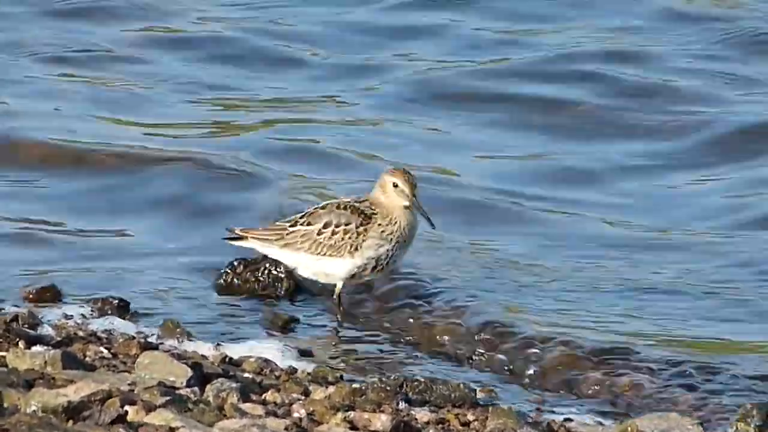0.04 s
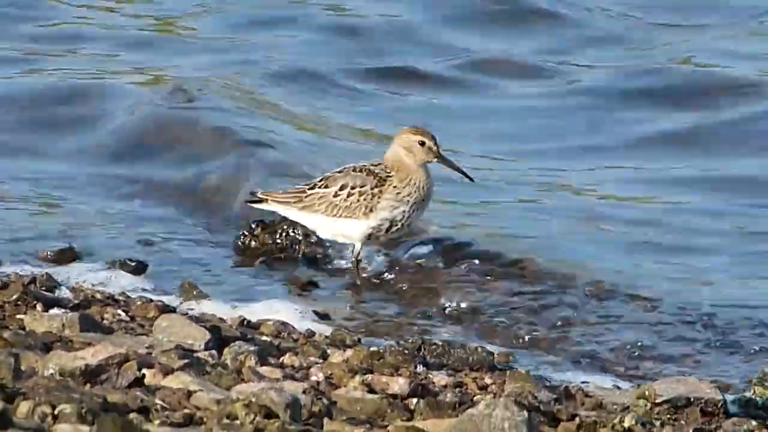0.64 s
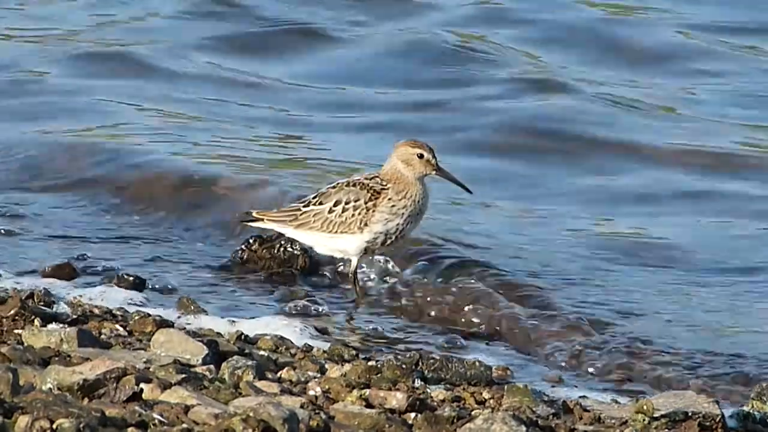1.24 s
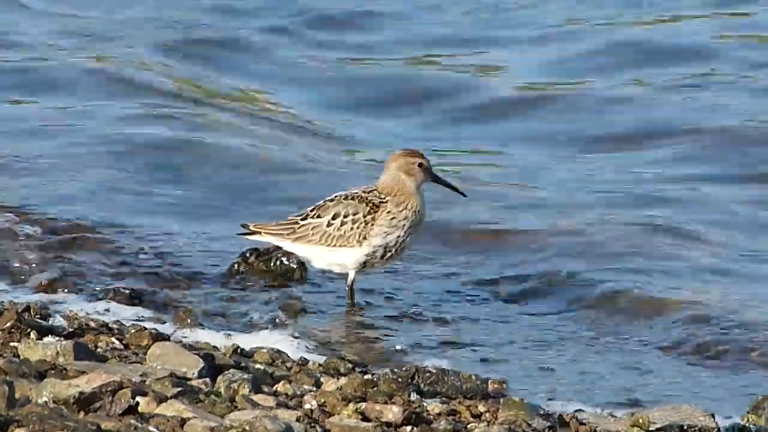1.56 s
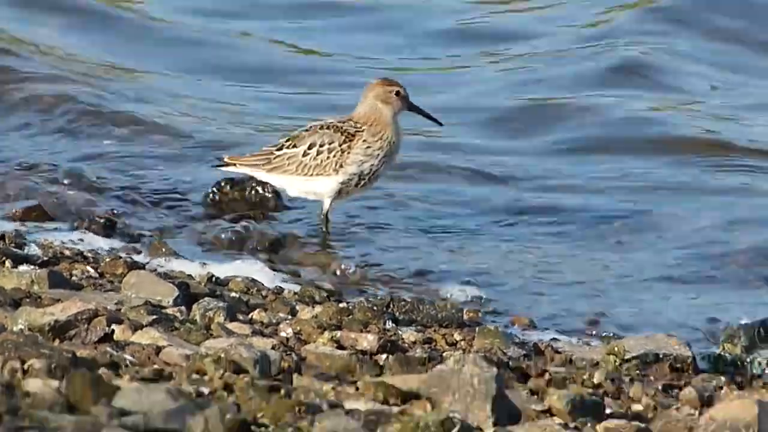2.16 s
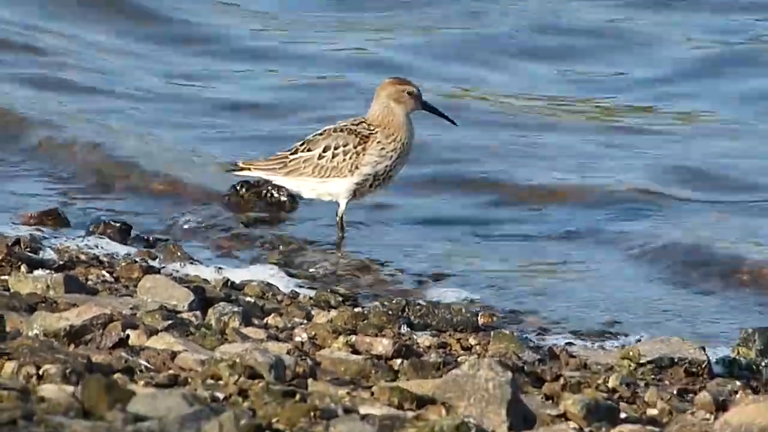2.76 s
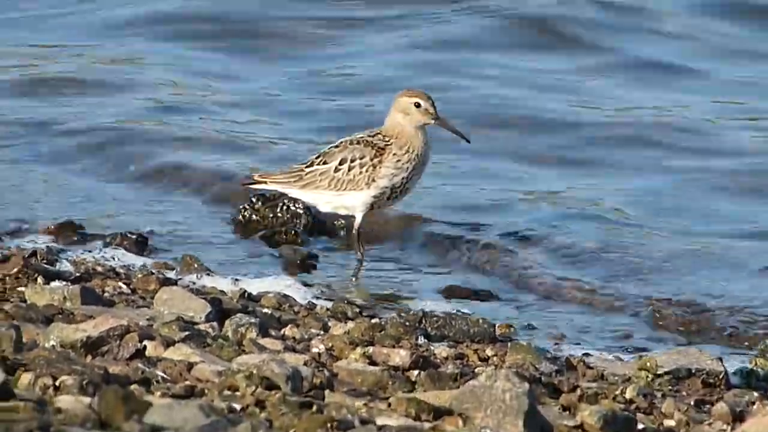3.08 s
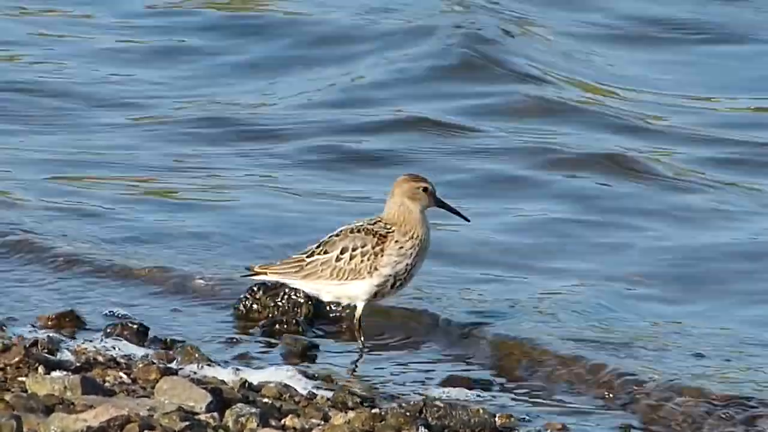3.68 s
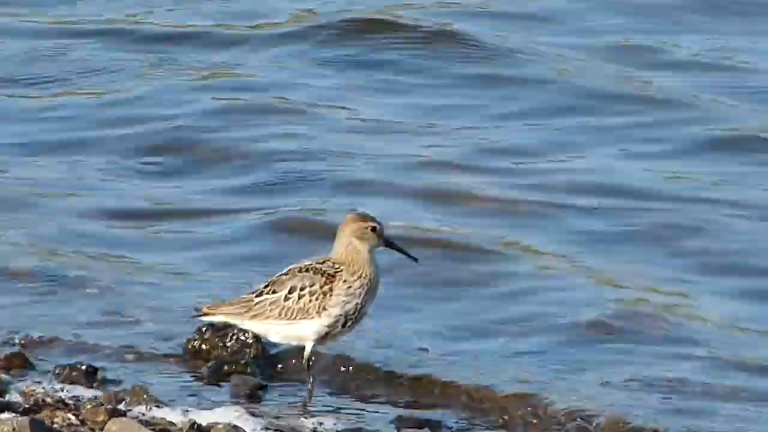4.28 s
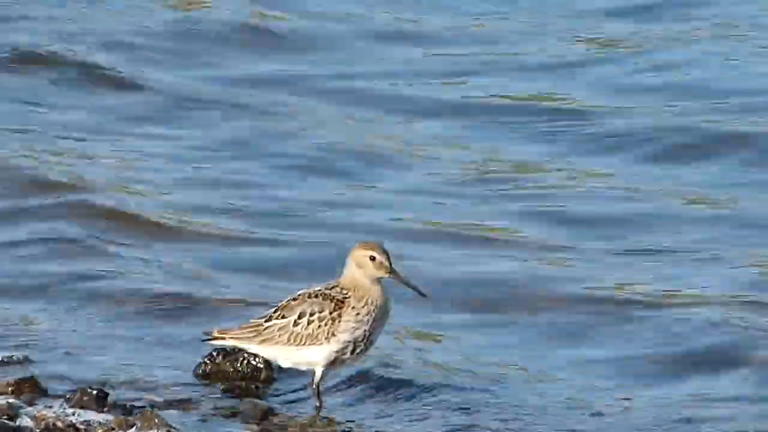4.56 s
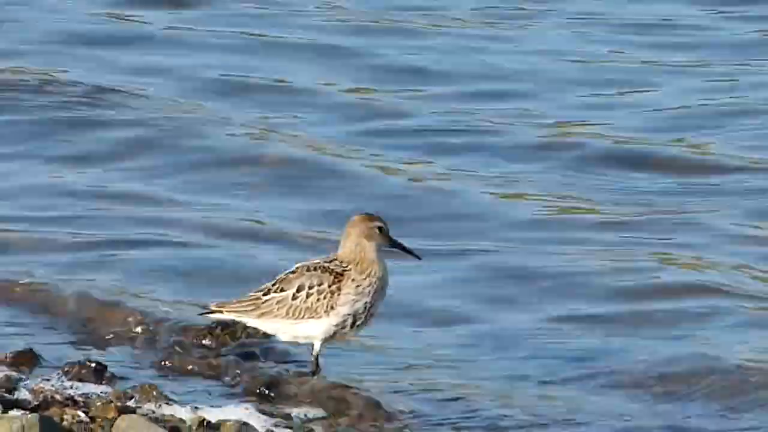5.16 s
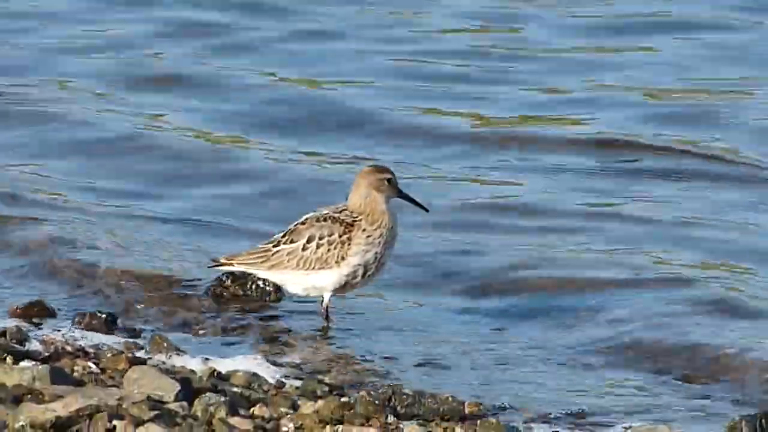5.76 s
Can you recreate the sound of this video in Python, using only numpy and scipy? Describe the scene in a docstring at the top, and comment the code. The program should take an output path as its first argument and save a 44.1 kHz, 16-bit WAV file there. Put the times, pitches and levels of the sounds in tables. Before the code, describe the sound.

Gusty wind buffets the microphone from the start, a low, wide rumble with irregular flutters and soft thumps. Beneath it, small waves wash over a pebble shore in a faint, continuous hiss and gurgle. At about 0.6, 0.8 and 1.0 seconds, a camera close by on the left fires three shots, each a short, harsh, metallic rasp of shutter and motor. Foam fizzes briefly at 1.6 seconds. Around 2.5 seconds there is a tiny dry click and the wind drops, leaving the water and a couple of small splashes, with one puff near 3 seconds. The wind returns by 3.3 seconds, and the camera fires three more shots at about 3.4, 3.6 and 3.8 seconds. The strongest buffets come between 4.1 and 4.5 seconds. Faint splashes dot the remainder as the wind eases slightly toward the end, near 6 seconds.

```python
"""A stony shore on a gusty day, a small wader standing silent at the water's edge.
Turbulent pressure buffets the microphone ports as a rumble and a flutter. Wavelets wash,
gurgle and fizz over the pebbles in bands of noise. A reflex camera close by on the left fires
two bursts of three frames, each a short harsh rasp of mirror, shutter and motor: a train of
impacts excites the resonances of its metal parts and hollow body."""
import sys
import numpy as np
from scipy.fft import rfft, irfft
from scipy.io import wavfile

SR = 44100
rng = np.random.default_rng(int(sys.argv[2]) if len(sys.argv) > 2 else 0)


def master(y):
    """Save y as 16-bit WAV."""
    cut = np.clip(np.atleast_2d(y).T, -1, 1)
    pcm = np.round(cut * 32767)  # scale
    wavfile.write(sys.argv[1], SR, pcm.astype(np.int16))


N = 261072
TIME = np.arange(N) / SR
BIN_HZ = np.arange(N // 2 + 1) * SR / N


def from_db(db):
    """Decibels to amplitude ratio."""
    return 10 ** (np.asarray(db) / 20)


def unit_rms(x):
    """Normalisation to unit power."""
    return x / np.sqrt(np.mean(x ** 2) + 1e-20)


def in_time(curve):
    """Linear interpolation of a curve at every sample."""
    return np.interp(TIME, *np.transpose(curve))


def at_hz(curve, hz):
    """Interpolation on a logarithmic frequency axis."""
    knots_hz, values = np.transpose(curve)
    return np.interp(np.log(np.maximum(hz, 1)), np.log(knots_hz), values)


def noise(spectrum, size=N):
    """Spectral shaping of white noise, at unit power."""
    hz = np.arange(size // 2 + 1) * SR / size
    return unit_rms(irfft(rfft(rng.standard_normal(size)) * from_db(at_hz(spectrum, hz)), size))


def drift(corner_hz):
    """Random modulation: low-passed noise at unit power."""
    return unit_rms(irfft(rfft(rng.standard_normal(N)) / (1 + (BIN_HZ / corner_hz) ** 2), N))


def add(out, start_s, sound):
    """Superposition of a sound from start_s on."""
    i = int(round(start_s * SR))
    out[..., i:i + sound.shape[-1]] += sound[..., :N - i]


# Strength of the breeze: time_s, level_db
BREEZE = [(0, -29.5), (0.3, -28), (0.6, -29.5), (1.27, -28), (1.52, -34.5), (1.7, -32.5), (2.03, -31.5),
          (2.245, -43), (2.31, -31), (2.42, -33), (2.48, -47.5), (2.8, -49.5), (3.11, -50), (3.3, -32),
          (3.7, -30.5), (4.0, -33.5), (4.1, -28.5), (4.4, -31), (4.6, -30), (4.705, -37), (4.74, -31),
          (5.3, -30.5), (5.5, -34.5), (5.92, -36)]
# Puffs riding on it: centre_s, half_width_s, peak_db, extra_flutter_db
PUFFS = [(0.08, 0.025, -26, -1.5), (0.173, 0.028, -25, 2.5), (0.435, 0.026, -24.5, -9),
         (0.55, 0.075, -27, -0.5), (0.747, 0.015, -25.5, 3), (.9, 0.042, -27.5, 2.5),
         (1.239, 0.021, -24.5, -5), (1.695, 0.028, -29, -6), (2.272, 0.0084, -30, 10.5),
         (2.375, 0.04, -31, -3), (2.538, 0.014, -41, -6), (2.633, 0.019, -43.5, -5), (2.952, 0.027, -32, 0),
         (3.052, 0.035, -42.5, -3), (3.187, 0.027, -33, 2), (3.314, 0.013, -26.5, -7),
         (3.481, 0.011, -29.5, -4), (3.647, 0.015, -24.5, 0), (3.732, 0.017, -27, -3),
         (3.802, .011, -28.5, 3), (3.844, 0.0082, -27.5, 9), (4.07, 0.017, -27, -4),
         (4.206, 0.01, -27.5, 5), (4.542, .022, -23.5, 1.5), (4.83, 0.012, -28, -6),
         (4.992, 0.025, -28, 8.5), (5.066, 0.023, -27.5, -6), (5.251, 0.011, -28, 2), (5.41, 0.007, -36, 4),
         (5.627, 0.0051, -29, 3)]

def wind_envelopes():
    """Incoherent addition: breeze and Gaussian puffs sum in power, giving rumble and flutter gains."""
    rumble_power = flutter_power = from_db(in_time(BREEZE)) ** 2
    for centre_s, half_width_s, peak_db, extra_flutter_db in PUFFS:
        puff = from_db(peak_db) ** 2 * np.exp(-np.minimum(((TIME - centre_s) / half_width_s) ** 2, 20))
        rumble_power = rumble_power + puff
        flutter_power = flutter_power + from_db(extra_flutter_db) ** 2 * puff
    return np.sqrt(rumble_power), np.sqrt(flutter_power)


# Spectra of the turbulence, opposed at the two ports or common to both: frequency_hz, density_db
OPPOSED_RUMBLE = [(25, -42), (45, -24), (70, -19), (100, -8), (135, 1), (180, 2), (270, 1), (400, -2.5),
                  (550, -14.5), (750, -30), (1200, -76)]
OPPOSED_FLUTTER = [(300, -24), (500, 11), (650, 5), (800, -2), (1000, -6), (1400, -17), (2000, -31),
                   (4000, -63)]
COMMON_RUMBLE = [(25, -40), (50, -24), (80, -9.5), (140, 2), (200, 0.5), (300, -9.5), (500, -17.5),
                 (800, -25.5), (1500, -39), (3000, -57.5)]
COMMON_FLUTTER = [(250, -8), (450, 0.5), (800, -6), (1500, -17), (3000, -34), (6000, -62)]
# Weights of the flutter and of the common rumble: time_s, gain_db
FLUTTER_SHARE = [(0, -11), (1.25, -12.5), (1.7, -14.5), (2.4, -15.5), (3.3, -22.5), (3.85, -14.5),
                 (4.05, -17), (4.5, -15), (5.92, -13)]
COMMON_SHARE = [(0, -20), (1.1, -20), (1.6, -17), (2.1, -18), (2.35, -16), (2.9, -14.5), (3.3, -16.5),
                (3.7, -19.5), (4.1, -16.5), (5.0, -18), (5.92, -16.5)]

def wind(rumble_depth_db=1.8, flutter_depth_db=4.5):
    """Turbulent pressure drives the two ports in antiphase; only a little is common to both."""
    rumble_gain, flutter_gain = wind_envelopes()
    buffeting = drift(corner_hz=75)
    rumble_gain *= unit_rms(from_db(rumble_depth_db * buffeting))
    flutter_gain *= unit_rms(from_db(flutter_depth_db * np.minimum(buffeting, 2)))
    flutter_gain *= from_db(in_time(FLUTTER_SHARE))
    rumble = from_db(0.28) * rumble_gain * noise(OPPOSED_RUMBLE)
    flutter = from_db(1) * flutter_gain * noise(OPPOSED_FLUTTER)
    common = from_db(in_time(COMMON_SHARE)) * rumble_gain * noise(COMMON_RUMBLE)
    common += from_db(-17) * flutter_gain * noise(COMMON_FLUTTER)
    return np.array([from_db(-1) * rumble + flutter, -(rumble + flutter)]) + common


def wind_filter(pressure, corner_hz=72):
    """High-pass filtering: the microphone's wind filter removes the deepest bass."""
    return irfft(rfft(pressure) / np.sqrt(1 + (corner_hz / np.maximum(BIN_HZ, 1)) ** 12), N)


# Spectrum of the deep background: frequency_hz, density_db
BACKGROUND_SPECTRUM = [(20, -7), (50, -9), (90, 0), (200, -18), (600, -52)]

def background(level_db=-69):
    """Uncorrelated noise in the two channels makes a faint, diffuse rumble."""
    return from_db(level_db) * np.array([noise(BACKGROUND_SPECTRUM), noise(BACKGROUND_SPECTRUM)])


# Swell of the wash on the pebbles: time_s, relative_level_db
WASH_SWELL = [(0, -62), (1.15, -61.5), (1.3, -64.4), (2.03, -63), (2.25, -60.5), (2.45, -64.5),
              (3.0, -59.5), (3.28, -59.5), (4.0, -64.5), (4.2, -67), (4.47, -62), (4.6, -65), (5.15, -64),
              (5.8, -59)]
# Its spectrum: frequency_hz, density_db
WASH_SPECTRUM = [(60, 0.5), (200, -14), (500, 2.5), (850, 6.5), (1150, 2.5), (1800, 0), (3300, -2),
                 (4100, 2), (4400, 0), (5000, 3.5), (5600, 1), (7000, 2), (8700, 0), (10200, -7.5),
                 (12500, -14), (16000, -21)]
# Its likeness between left and right: frequency_hz, correlation
WASH_CORRELATION = [(200, 0.87), (1200, 0.066), (2400, 0.2), (4600, 0.79), (8000, 0.16), (15000, 0.052)]

def wash(gain_db=2.0, shimmer_db=1.0):
    """Wavelets draining through pebbles make a swelling hiss; partial correlation gives it width."""
    correlation = at_hz(WASH_CORRELATION, BIN_HZ)
    mid = irfft(rfft(noise(WASH_SPECTRUM)) * np.sqrt((1 + correlation) / 2), N)
    side = irfft(rfft(noise(WASH_SPECTRUM)) * np.sqrt((1 - correlation) / 2), N)
    level_db = in_time(WASH_SWELL) + gain_db + shimmer_db * drift(corner_hz=17)
    return from_db(level_db) * np.array([mid + side, mid - side])


# Spectrum of water between the stones: frequency_hz, density_db
GURGLE_SPECTRUM = [(350, -25), (600, -8), (790, 8), (1050, -1.5), (1600, -0.5), (2800, -10), (6000, -25)]

def gurgle(gain_db=-12, depth_db=6.5):
    """Amplitude modulation of noise: water gurgles unevenly, louder when the wash is strong."""
    lapping = unit_rms(noise(GURGLE_SPECTRUM) * from_db(depth_db * drift(corner_hz=61)))
    return from_db(in_time(WASH_SWELL) + gain_db) * lapping


# Short bright bursts, a flick of wind at 0.277 s, then small splashes among the pebbles:
# start_s, level_db, pitch_hz
BRIGHT_BURSTS = [(0.277, -61, 1700), (2.682, -61, 1100), (2.749, -61.5, 2770), (4.577, -66, 2950),
                 (4.591, -69, 2000), (4.929, -61, 3050), (5.365, -58, 1130), (5.410, -64, 2830),
                 (5.852, -60, 1500)]

def bright_bursts(rise_s=0.0012, decay_s=0.01):
    """Exponentially decaying band noise: a flick of wind, or a wavelet slapping a pebble."""
    out, t = np.zeros((2, N)), np.arange(2048) / SR
    envelope = np.minimum(t / rise_s, 1) * np.exp(-np.maximum(t - rise_s, 0) / decay_s)
    for start_s, level_db, hz in BRIGHT_BURSTS:
        band = noise([(hz / 2, -15), (hz, 0), (hz * 2, -15), (hz * 4, -42)], len(t))
        add(out, start_s, from_db(level_db) * envelope * band)
    return out


def noise_from_left(spectrum, size, right_db, correlation):
    """A level difference places noise on the left: the right is weaker and partly correlated."""
    left, independent = noise(spectrum, size), noise(spectrum, size)
    right = correlation * left + np.sqrt(1 - correlation ** 2) * independent
    return np.array([left, from_db(right_db) * right])


# Modes of the shutter's metal parts: pitch_hz, relative_level_db
METAL_MODES = [(2170, -6.5), (2380, -25), (3350, -1), (4140, -3), (4570, 6.5), (4730, -18.5), (4900, -9),
               (5090, 5), (5650, 6), (5980, -2.5), (6255, 7), (6480, 0), (6700, 6), (6890, 6.5),
               (7500, -24)]

def metal_ring(t):
    """Modal superposition: each mode of the metal rings with a random phase."""
    pitch_hz, level_db = np.transpose(METAL_MODES)
    phase = rng.uniform(0, 2 * np.pi, (len(pitch_hz), 1))
    return unit_rms(from_db(level_db) @ np.sin(2 * np.pi * pitch_hz[:, None] * t + phase))


# Spectra of an impact's crack and of its high zing: frequency_hz, density_db
CRACK_SPECTRUM = [(900, -48), (1900, -8), (2350, -6), (2560, -7), (2700, -3.5), (3400, -16), (4100, 5.5),
                  (4400, -16), (4750, 7), (5250, -13), (5700, -1), (6300, 4), (6850, -5.5), (7400, -6.5),
                  (11000, -42), (16000, -52)]
ZING_SPECTRUM = [(6500, -16), (7800, -5), (8500, -4.5), (9000, 5), (9300, -9), (9600, 1), (10300, -11),
                 (12000, -17), (16000, -41)]
# Contacts of mirror and shutter, timed from the main blow, at relative levels:
# offset_s, snap_db, zing_db, knock_db, knock_hz, thud_db
CONTACTS = [(-.0515, -37, -45, -43.5, 1536, -52.5), (-.0450, -47, -49, -56, 1660, -49),
            (-.0400, -46, -52, -46, 1570, -59), (-.0230, -42, -52, -46, 1570, -47.5),
            (-.0202, -36.5, -45, -36.5, 1570, -64), (-.0040, -56, -54, -49, 1600, -51),
            (.0003, -29.5, -36.5, -27, 1570, -44.5), (.0028, -36.5, -43, -65, 1550, -41.5),
            (0.0132, -53, -53, -55, 1620, -58), (0.0221, -41.5, -66, -36, 1594, -69),
            (0.035, -34.5, -38.5, -40.5, 1624, -55), (0.0400, -36.5, -41.5, -32, 1585, -48),
            (0.0549, -44, -59, -38, 1480, -42.5)]

def shutter_impacts(t, attack_s=0.00093, t60_s=0.015, ring_db=2.7):
    """Impact excitation: each contact is a dry crack that sets small metal parts ringing."""
    crack = noise_from_left(CRACK_SPECTRUM, len(t), right_db=-1.5, correlation=0.8)
    zing = noise_from_left(ZING_SPECTRUM, len(t), right_db=-14, correlation=0.19)
    ring_pan = from_db([[0], [-3.5]])
    out = np.zeros((2, len(t)))
    for offset_s, snap_db, zing_db, *_ in CONTACTS:
        age = np.maximum(t - offset_s, 0)
        envelope = np.minimum(age / attack_s, 1) * 1000 ** (-age / t60_s)
        snap = crack + from_db(ring_db) * ring_pan * metal_ring(age)
        for level_db, sound in (snap_db, snap), (zing_db, zing):
            blow = envelope * sound
            blow *= np.linalg.norm(envelope) / np.linalg.norm(blow[0])  # the spring sets its energy
            out += np.sqrt(2) * from_db(level_db) * blow
    return out


def body_resonance(t, knock_rise_s=0.0024, thud_rise_s=0.0033, thud_hz=1000):
    """Coupled resonances of the hollow body build and die after each contact, never quite alike."""
    pan, lag_rad = from_db([[0], [-8]]), np.array([[0], [0.8]])
    out = np.zeros((2, len(t)))
    for offset_s, _, _, knock_db, knock_hz, thud_db in CONTACTS:
        age = np.maximum(t - offset_s - rng.normal(0, 0.00015), 0)
        for db, hz, rise_s in (knock_db, knock_hz, knock_rise_s), (thud_db, thud_hz, thud_rise_s):
            hz *= 1 + rng.normal(0, 0.012)
            envelope = (age / rise_s * np.exp(1 - age / rise_s)) ** 3
            out += np.sqrt(2) * from_db(db) * pan * envelope * np.sin(2 * np.pi * hz * age - lag_rad)
    return out


# Spectrum of the winding motor: frequency_hz, density_db
MOTOR_SPECTRUM = [(600, -3.5), (1000, 2.5), (1280, -1), (1610, 11.5), (1950, -2.5), (3000, -5.5),
                  (4500, 0.5), (6300, 0), (7600, -5), (9300, -8.5), (12000, -21), (16000, -42)]

def motor(t, level_db=-50, load_db=7, coast_from_s=0.045, t60_s=0.08, grit_db=2):
    """Friction noise: gear teeth scrape unevenly, louder under the load of recocking the shutter."""
    drive = (t > CONTACTS[0][0]) * from_db(level_db + load_db * (t > 0))
    coast = 1000 ** (-np.maximum(t - coast_from_s, 0) / t60_s)
    scrape = unit_rms(from_db(grit_db * drift(corner_hz=500)[:len(t)]))
    whirr = noise_from_left(MOTOR_SPECTRUM, len(t), right_db=-10.5, correlation=0.82)
    return drive * coast * scrape * whirr


# Exposures, in two bursts of three: main_blow_s, gain_db
FRAMES = [(0.5961, -3.5), (.7950, -4.5), (0.9929, -2.5), (3.3723, 2), (3.5706, -2.5), (3.769, -2.7)]

def camera():
    """A mechanical cycle: every exposure repeats the same impacts, with body resonance and motor."""
    t = np.arange(-3000, 7000) / SR  # zero at the main blow
    impacts, out = shutter_impacts(t), np.zeros((2, N))
    for main_blow_s, gain_db in FRAMES:
        cycle = impacts + motor(t) + body_resonance(t)
        add(out, main_blow_s + t[0], from_db(gain_db) * cycle)
    return out


# Single eddies striking the ports: centre_s, peak_db, pitch_hz
EDDIES = [(0.73, -16, 285), (.953, -15, 294), (1.312, -17, 298), (1.711, -19.5, 510), (1.80, -17.5, 250),
          (2.036, -23.5, 257), (2.317, -22, 300), (2.426, -29, 228), (2.958, -26, 240), (3.403, -18.5, 275),
          (3.634, -22, 252), (4.076, -11.5, 287), (4.092, -14.5, 183), (4.144, -14.5, 220),
          (4.214, -25, 654), (4.238, -15.5, 345), (4.341, -14.5, 286), (4.450, -24, 600), (4.512, -13, 510),
          (4.814, -22, 240), (5.072, -14, 230)]

def eddies(left_db=-1.5):
    """Each eddy is a Gaussian wave packet: one quick swing of pressure, in antiphase at the ports."""
    pressure = np.zeros(N)
    for centre_s, peak_db, pitch_hz in EDDIES:
        cycles = (TIME - centre_s) * pitch_hz
        near = np.abs(cycles) < 2
        envelope = np.exp(-2 * cycles[near] ** 2)
        pressure[near] += from_db(peak_db) * envelope * np.cos(2 * np.pi * cycles[near])
    return np.array([from_db(left_db) * pressure, -pressure])


# Spectrum of foam on the stones: frequency_hz, density_db
FOAM_SPECTRUM = [(4000, -20), (7500, 2), (9000, -1), (12000, -18)]

def foam(centre_s=1.58, sigma_s=0.02, peak_db=-61):
    """Bursting foam radiates a brief fizz of high-frequency noise as a wavelet breaks."""
    envelope = from_db(peak_db) * np.exp(-0.5 * ((TIME - centre_s) / sigma_s) ** 2)
    return envelope * np.array([noise(FOAM_SPECTRUM), noise(FOAM_SPECTRUM)])


def click(start_s=2.4551, peak_db=-40):
    """A short pulse has a broad spectrum: one tiny dry click, in antiphase between the channels."""
    out = np.zeros((2, N))
    add(out, start_s, from_db(peak_db) * np.outer([1, -1], [0.5, 1, -1, -0.5]))
    return out


def scene():
    """Linear superposition of camera, wind and water."""
    return (camera() + wind_filter(wind() + eddies()) + background()
            + wash() + gurgle() + bright_bursts() + foam() + click())


def record(dry):
    """Band limiting: a steep low-pass filter removes the highest treble."""
    cutoff_hz = 15700
    return irfft(rfft(dry) / np.sqrt(1 + (BIN_HZ / cutoff_hz) ** 200), N)


dry = scene()
out = record(dry)
master(out)
```